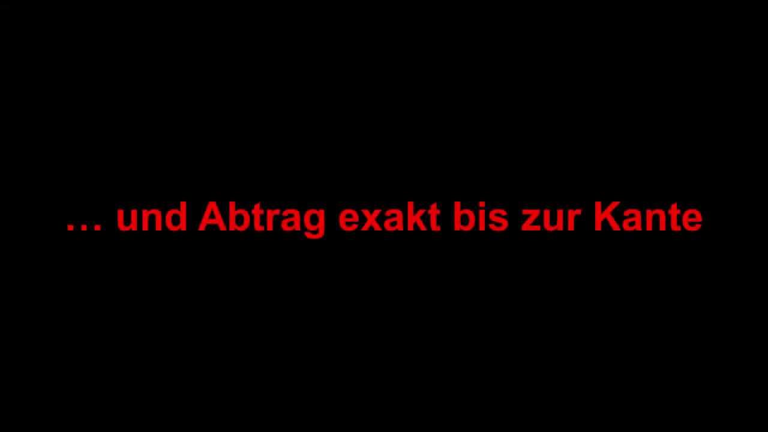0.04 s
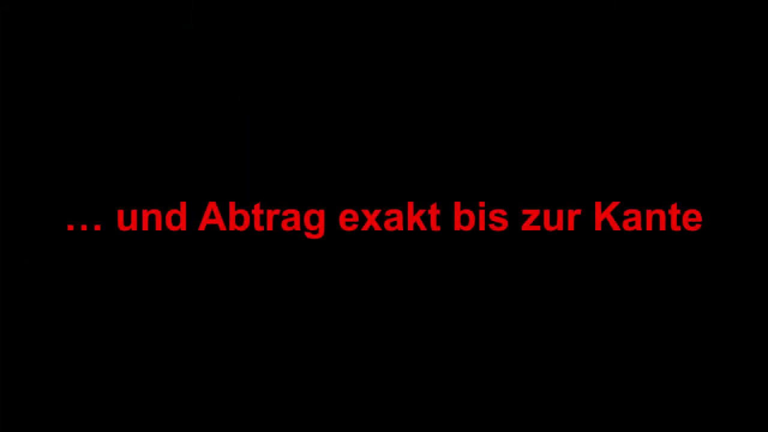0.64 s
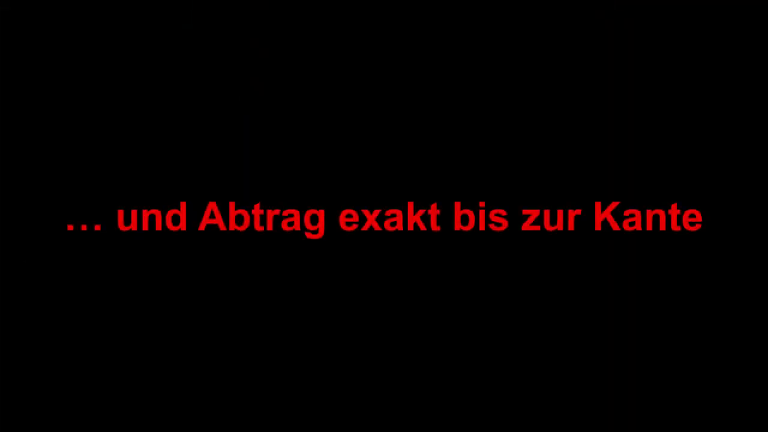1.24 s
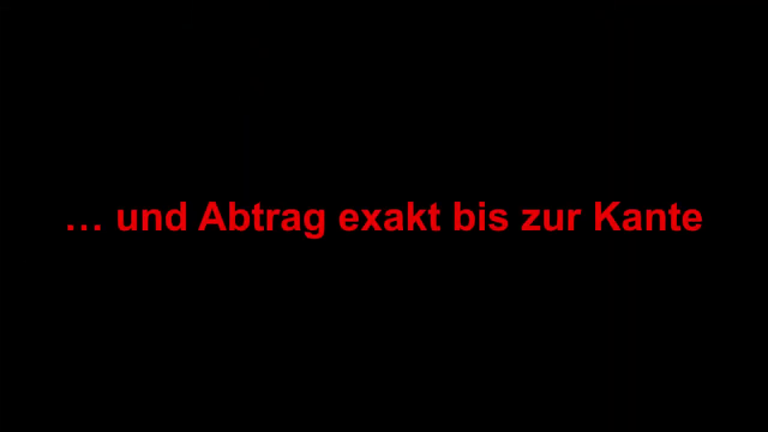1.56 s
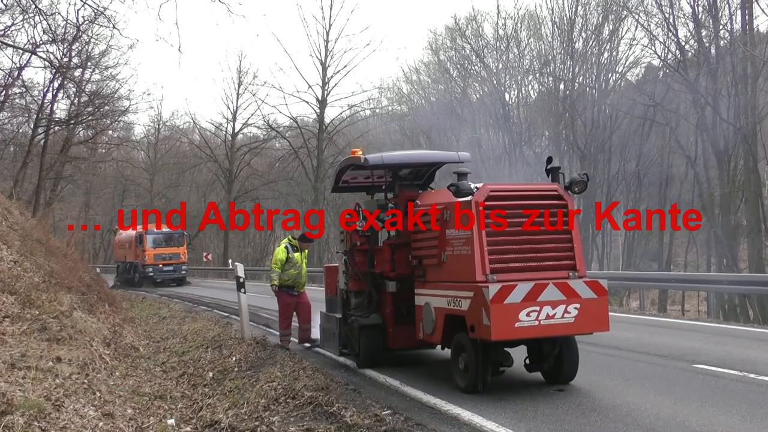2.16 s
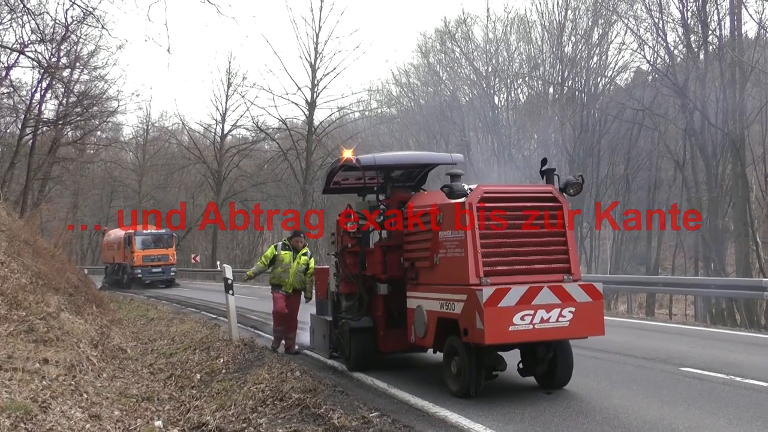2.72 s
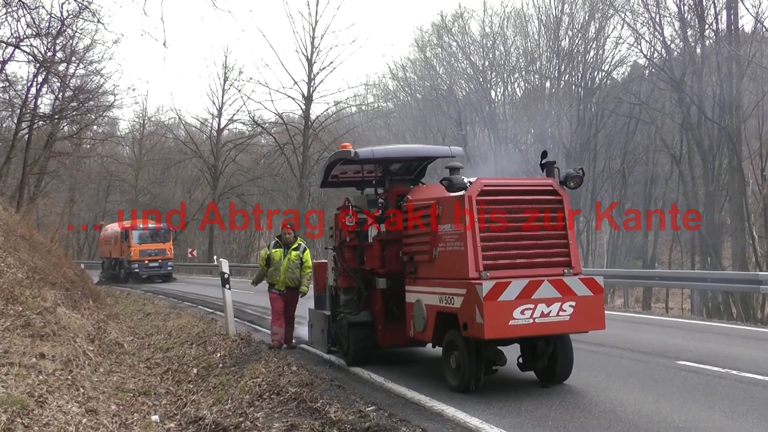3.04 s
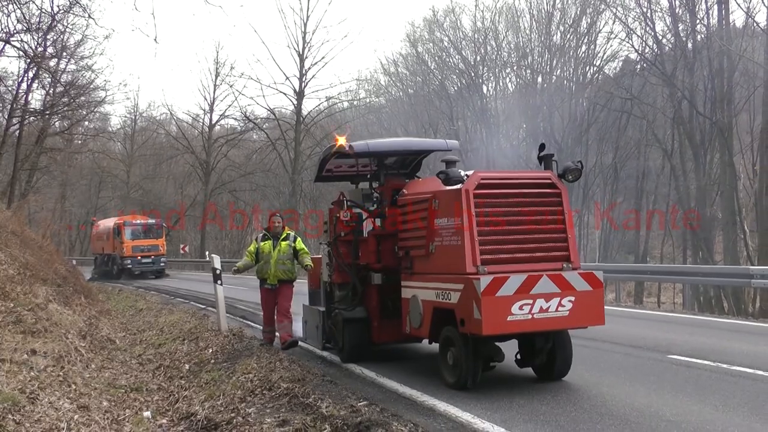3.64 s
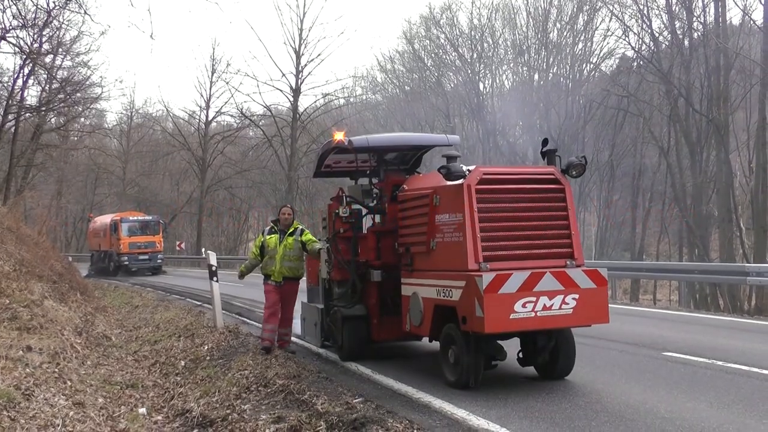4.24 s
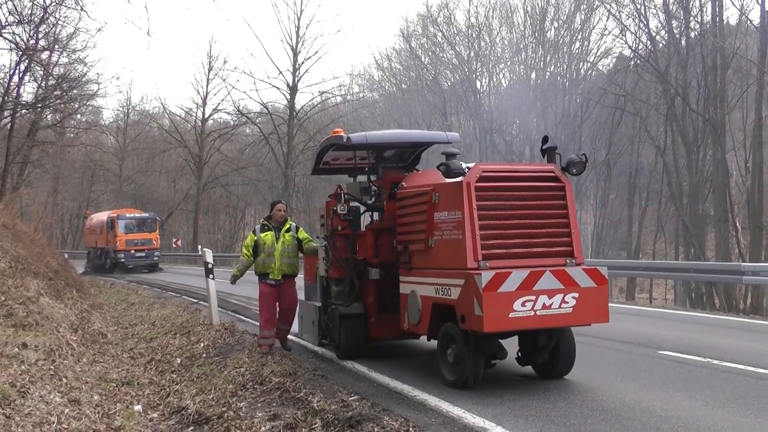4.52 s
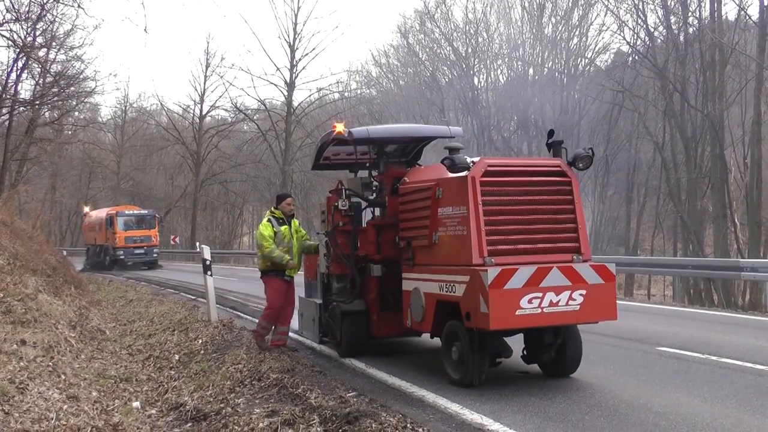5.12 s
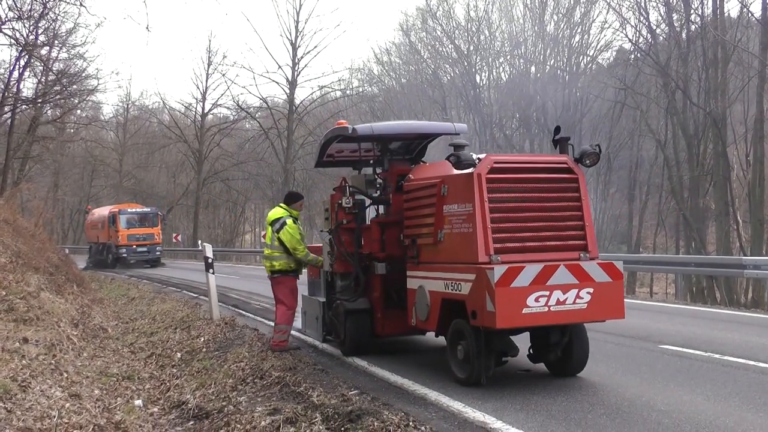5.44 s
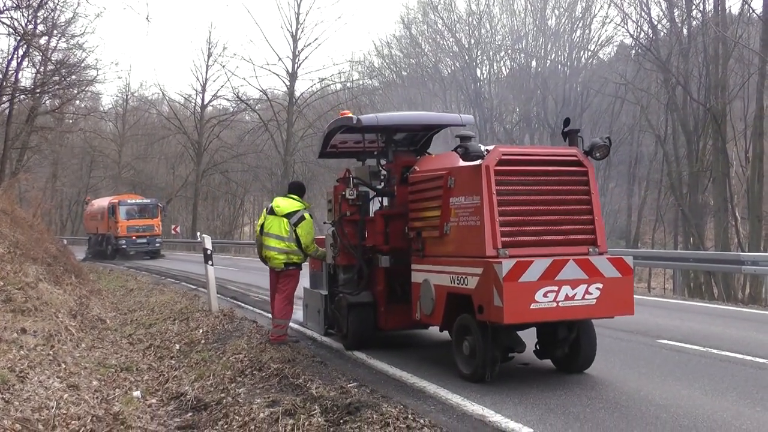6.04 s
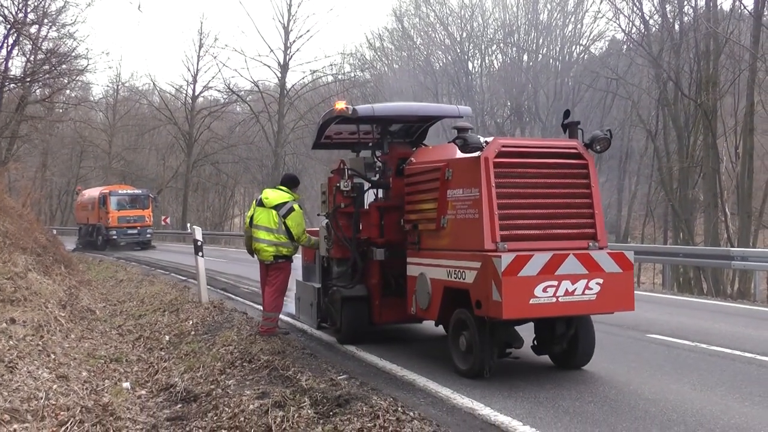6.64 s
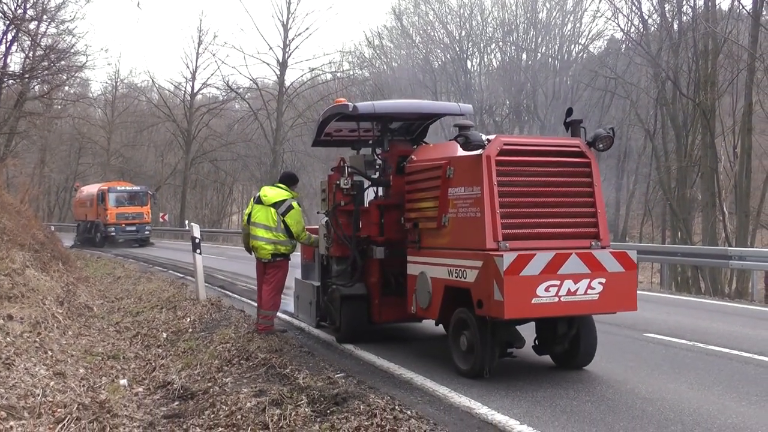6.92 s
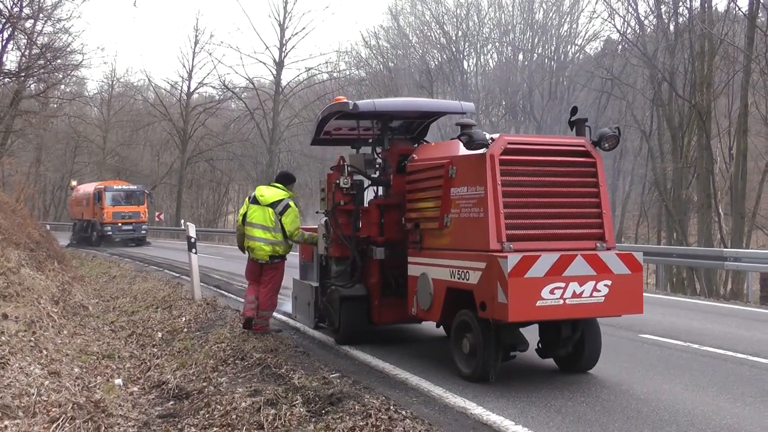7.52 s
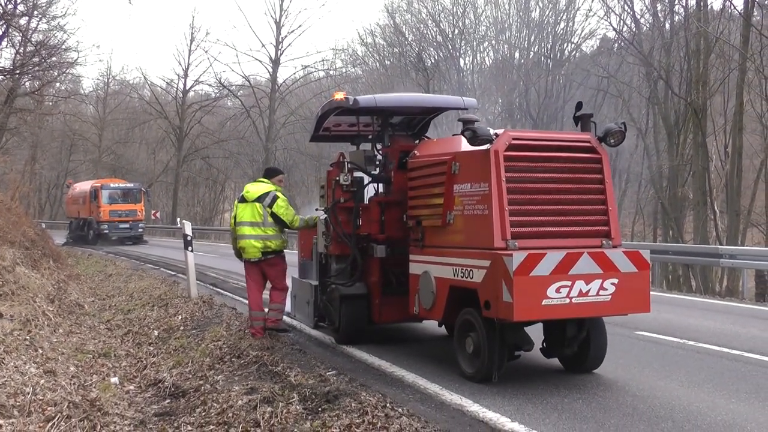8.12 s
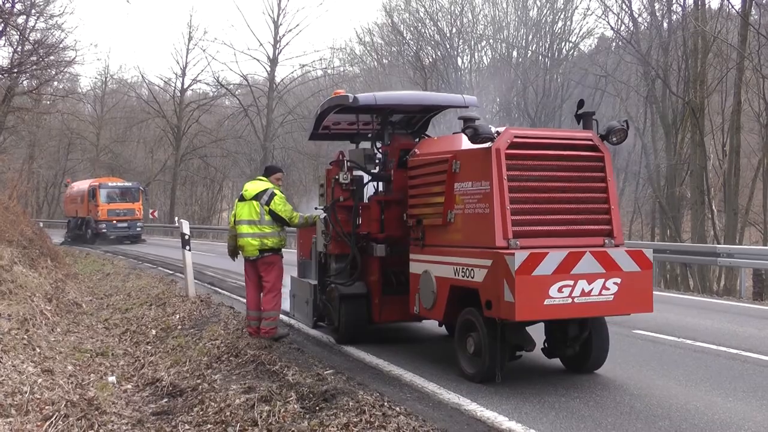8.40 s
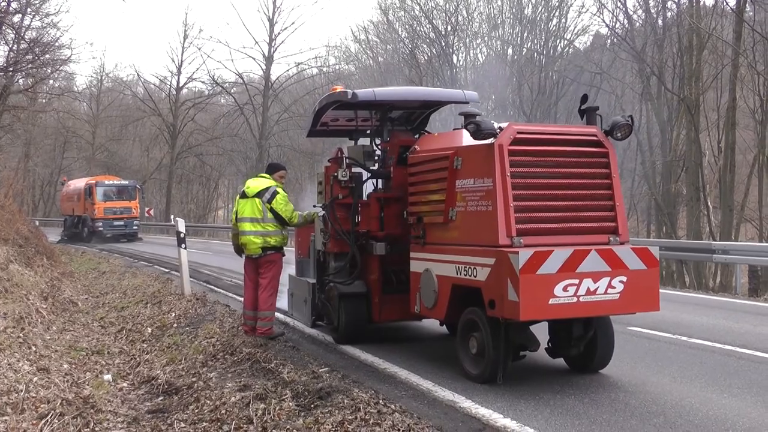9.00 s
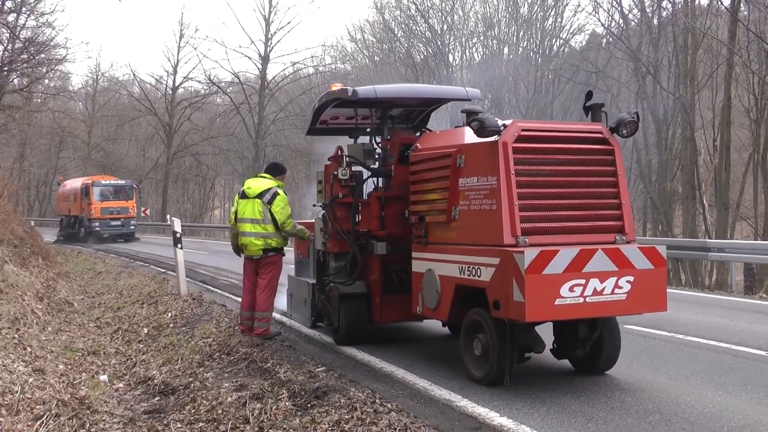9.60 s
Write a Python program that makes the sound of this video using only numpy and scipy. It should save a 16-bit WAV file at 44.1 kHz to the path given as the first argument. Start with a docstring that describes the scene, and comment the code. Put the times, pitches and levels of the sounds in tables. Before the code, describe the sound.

Steady diesel drone and fan howl of a road milling machine outdoors, with a rumbling, hissing cut that rasps now and then.

```python
"""Beside a country road, a stereo microphone stands a few metres from a small, creeping road milling machine.
After about a second of silence it fades in, already at work: the four-cylinder diesel drones and the
cooling fan howls, while over a low rumble the drum's picks thump into the asphalt, make the steel housing
roar and throw up a hiss of grit. From two seconds on, the cut surges and rasps over hard patches,
and the fan's hum grows as the machine comes nearer."""
import sys
import numpy as np
from scipy import signal
from scipy.fft import rfft, irfft
from scipy.io import wavfile

SR = 44100
rng = np.random.default_rng(int(sys.argv[2]) if len(sys.argv) > 2 else 0)


def int16_out(signal):
    """Quantize to a 16-bit WAV file."""
    q = np.round(np.clip(np.atleast_2d(signal).T, -1, 1) * 32767)
    wavfile.write(sys.argv[1], SR, q.astype(np.int16))


N = 430416
TIME = np.arange(N) / SR
FREQS = np.maximum(np.arange(N // 2 + 1) * SR / N, 1)
UNEVEN_HZ = 9.0   # how fast the levels of the cut waver

# Speed of the diesel, which also drives the fan. Each row: time in seconds, revolutions per minute.
ENGINE_RPM = [(1.31, 2360.0), (2.6, 2355.0), (3.03, 2336.0), (3.67, 2341.0), (4.53, 2317.0), (6.25, 2317.0),
              (6.47, 2342.0), (7.33, 2323.0), (8.4, 2312.0), (8.83, 2328.0), (9.69, 2325.0)]


def from_db(db):
    """Decibels to gain."""
    return 10 ** (np.asarray(db) / 20)


def in_time(points):
    """Points joined by straight lines over time."""
    seconds, value = np.transpose(points)
    return np.interp(TIME, seconds, value)


def over_hz(points):
    """Points joined by straight lines over log frequency."""
    hz, value = np.transpose(points)
    return np.interp(np.log(FREQS), np.log(hz), value)


def rms_one(x):
    """Scale to an rms of 1."""
    return x / np.sqrt(np.mean(x ** 2) + 1e-20)


def drift(rate_hz):
    """Slow random motion of spread 1."""
    return rms_one(irfft(rfft(rng.standard_normal(N)) / (1 + (FREQS / rate_hz) ** 2), N))


def tone(cycles, flutter, flutter_hz):
    """A tone of rms 1 whose strength and phase flutter in turbulent air."""
    swing = 1 + flutter * (drift(flutter_hz) + 1j * drift(flutter_hz)) / np.sqrt(2)
    return rms_one(np.real(swing * np.exp(2j * np.pi * (cycles + rng.random()))))


def impacts(per_s, spread_db):
    """Random clicks, many small and a few large."""
    sizes = from_db(spread_db * np.minimum(rng.exponential(1, N), 4))
    return sizes * rng.choice([-1, 1], N) * (rng.random(N) < per_s / SR)


def coloured(x, spectrum):
    """Pass x through a body with this spectrum, falling steeply beyond its ends; rms 1."""
    skirts = (1 + (spectrum[0][0] / FREQS) ** 8) * (1 + (FREQS / spectrum[-1][0]) ** 8)
    return rms_one(irfft(rfft(x) * from_db(over_hz(spectrum)) / np.sqrt(skirts), N))


def engine():
    """The diesel fires twice a turn; unequal cylinders add the orders between."""
    # Exhaust tones. Each row: multiple of the crank speed, level in dB halfway through.
    orders = [(1.5, -67), (2, -50.5), (4, -37.5), (4.5, -61), (5.5, -45.5), (6.5, -52)]
    turns = np.cumsum(in_time(ENGINE_RPM)) / 60 / SR
    drone = sum(from_db(db) * tone(k * turns, flutter=0.18, flutter_hz=6.1) for k, db in orders)
    return drone * from_db(-0.28 * (TIME - TIME.mean()))   # softens a little along the way


def fan():
    """The blades give a clean hum and rougher overtones; unequal blades add weak tones beside them."""
    # The blade-pass hum, growing as the machine nears. Each row: time in seconds, level in dB.
    hum_level = [(1.9, -38.5), (2.5, -38), (2.95, -43.5), (3.5, -37), (4.3, -38.5), (5.0, -35),
                 (7.3, -33.5), (9.3, -32)]
    # The howl. Each row: multiple of the shaft speed, level in dB halfway through,
    # share of flutter, flutter rate in Hz.
    overtones = [(19, -46.5, 1.1, 13), (23, -44, 1.9, 9.9), (24, -32.5, 0.41, 46), (35, -50, 1.1, 12),
                 (36, -45.5, 0.47, 6.5), (48, -40.5, 0.27, 20)]
    blades, blade_pass_hz, working_rpm = 12, 362.3, 2330
    lag_s, follows = 0.15, 0.32   # the fan trails the engine and takes up only a share of its swings
    rpm = np.interp(TIME - lag_s, TIME, in_time(ENGINE_RPM))
    passes = np.cumsum(blade_pass_hz * (1 + follows * (rpm / working_rpm - 1))) / SR
    hum = from_db(in_time(hum_level)) * tone(passes, flutter=0.1, flutter_hz=10.0)
    howl = sum(from_db(db) * tone(k * passes / blades, share, hz) for k, db, share, hz in overtones)
    return hum + howl * from_db(-0.05 * (TIME - TIME.mean()))   # the howl mellows on the approach


def pick_thumps(surge_db):
    """The picks thump into the road, biting deepest once in each turn of the drum."""
    # Slow course of the thumping. Each row: time in seconds, level in dB.
    level = [(1.9, -33.5), (3.3, -34), (3.6, -31.3), (4.25, -32.5), (4.6, -34.5), (7.3, -33), (7.85, -35),
             (8.4, -32.5), (9.7, -32.5)]
    # Colour of a thump. Each row: frequency in Hz, relative level in dB.
    colour = [(125, -10), (145, -3.5), (175, 3), (198, -0.5), (220, 2.2), (260, 2.5), (285, -2),
              (340, -6.5), (450, -20)]
    turns_per_s, deepest_bite_s = 3.02, 2.283
    bite_db = 1.34 * np.cos(2 * np.pi * turns_per_s * (TIME - deepest_bite_s))
    level_db = in_time(level) + 0.6 * surge_db + bite_db + 0.5 * drift(UNEVEN_HZ)
    return from_db(level_db) * coloured(impacts(per_s=1400, spread_db=0.8), colour)


def low_rumble():
    """A low rumble whose loudness wanders at random."""
    # Chance swells and dips of the rumble. Each row: time in seconds, level in dB.
    swells = [(1.9, -42), (3.05, -41), (3.4, -46), (4.2, -39), (4.6, -42.5), (6.05, -39.5), (6.6, -43),
              (7.35, -41.5), (7.8, -42.5), (9.3, -40.5), (9.7, -46)]
    # Colour of the rumble. Each row: frequency in Hz, relative level in dB.
    colour = [(20, -29), (45, -23), (58, -23), (72, -0.5), (84, -6.5), (96, -4.5), (108, 4), (118, -1),
              (135, -11)]
    level_db = in_time(swells) + drift(UNEVEN_HZ)
    return from_db(level_db) * coloured(impacts(per_s=900, spread_db=1.8), colour)


def housing_roar(effort_db, asphalt):
    """Broken lumps drum on the steel housing so densely that it roars."""
    # Colour of the housing. Each row: frequency in Hz, relative level in dB.
    colour = [(280, -12), (360, -8.5), (430, -5.5), (490, -3.0), (600, -0.1), (700, -1.5), (780, -3.5),
              (860, -2.5), (930, -8), (1170, -9), (1380, -6), (1480, -4.5), (1600, -7.5), (1950, -18)]
    fall_db_per_s = 0.15
    level_db = -27 + 0.75 * effort_db + 0.5 * asphalt - fall_db_per_s * TIME
    return from_db(level_db) * coloured(impacts(per_s=6000, spread_db=1.6), colour)


def grit_hiss(effort_db, asphalt):
    """Fine grit sprays on the picks and their steel holders, which add their ring to the hiss."""
    # Colour of the spray. Each row: frequency in Hz, relative level in dB.
    colour = [(1450, -7.5), (1780, -2.5), (2150, -1.5), (2900, -2.5), (3550, -9), (4300, -11), (5800, -15),
              (7500, -18.5), (8700, -23), (11000, -28), (14000, -31), (15600, -32.5)]
    # Resonances of the steel. Each row: frequency in Hz, width in Hz, height above the hiss in dB.
    steel_modes = [(2120, 150, 3), (2960, 280, -0.3), (3880, 110, 4), (4450, 250, 4), (5030, 310, 3.5),
                   (5760, 210, 4.5), (6300, 220, 2), (7000, 280, 1.4), (7900, 490, 2), (9400, 350, 1),
                   (11900, 250, 0.5), (13900, 370, 2)]
    spray = coloured(impacts(per_s=19000, spread_db=2.5), colour)
    ring = sum((from_db(db) - 1) / (1 + 2j * (FREQS - hz) / width) for hz, width, db in steel_modes)
    level_db = -30.5 + 0.75 * effort_db + 0.45 * asphalt
    return from_db(level_db) * rms_one(irfft(rfft(spray) * (1 + ring), N))


def pick_rasp(surge_db):
    """The picks rasp only while they cross a hard patch."""
    # Colour of the rasp. Each row: frequency in Hz, relative level in dB.
    colour = [(1900, -6), (2800, 2), (3400, -7)]
    extra_power = np.maximum(from_db(surge_db) ** 2 - 1, 0)
    return from_db(-35.5) * np.sqrt(extra_power) * coloured(impacts(per_s=3500, spread_db=4.0), colour)


def drum():
    """The sounds of the cut over the low rumble, with a rounded surge at each hard patch."""
    # How hard the drum cuts. Each row: time in seconds, relative load in dB.
    load = [(1.96, 0.6), (3.36, 0.2), (3.56, -0.4), (5.55, -0.14), (5.95, 0), (7.15, 0.3), (7.75, -0.1),
            (8.94, 0.26), (9.14, -0.7), (9.74, 0.2)]
    # Hard patches in the road. Each row: crest in seconds, length in seconds, extra load in dB.
    hard_patches = [(2.02, 0.088, 1.1), (2.192, 0.089, 1), (2.68, 0.092, 0.5), (3.56, 0.12, 3.5),
                    (3.76, 0.099, 2), (4.16, 0.11, 2.3), (4.498, 0.084, 2), (5.163, .1, 1.5),
                    (5.878, .09, 2), (6.065, .12, 1.2), (6.51, 0.09, 1.9), (7.145, .12, 1.5),
                    (8.934, 0.4, 1.1), (9.31, 0.058, 2.5)]
    surge_db = sum(db * np.exp(-(2 * (TIME - crest) / length) ** 2) for crest, length, db in hard_patches)
    effort_db = in_time(load) + surge_db
    asphalt = drift(UNEVEN_HZ)   # the road changes under the picks: roar and hiss waver together
    low_end = pick_thumps(surge_db) + low_rumble()
    debris = housing_roar(effort_db, asphalt) + grit_hiss(effort_db, asphalt)
    return low_end + debris + pick_rasp(surge_db)


def roadside(x, scatter_s):
    """Bank, trees and guard rail scatter the sound, so left and right hear it a little differently."""
    # Scattered sound. Each row: frequency in Hz, level against the direct sound in dB.
    diffuse = [(30, -9), (80, -18), (230, -16.5), (410, -17), (740, -16), (1050, -9.5), (1450, -15),
               (3000, -14.5), (5000, -16), (8500, -11), (10000, -41)]
    tail = rng.standard_normal(N) * np.exp(-np.minimum(TIME / scatter_s, 20))
    scattered = np.exp(1j * np.angle(rfft(tail))) * from_db(over_hz(diffuse))
    sides = np.array([[1], [-1]])
    return irfft(rfft(x) * (1 + sides * scattered), N)


def microphone(x):
    """Level and phase differ between the microphone's left and right ports."""
    # Balance of the ports. Each row: frequency in Hz, left minus right in dB.
    balance = [(100, 1), (280, 0.3), (420, -3.5), (700, -1.8), (880, 1), (1080, -5), (1380, 0),
               (2300, -0.7), (3300, 1.5), (5200, 0), (6500, 0), (8000, -1), (9200, 0)]
    # Phase between the ports. Each row: frequency in Hz, lead of the left in radians.
    lead = [(60, -0.22), (260, -0.15), (370, -0.49), (500, -0.18), (740, 0.0032), (970, -0.19),
            (1200, -0.0087), (1550, -0.27), (1800, 0.13), (4000, 0.022)]
    sides = np.array([[0.5], [-0.5]])
    return irfft(rfft(x) * from_db(sides * over_hz(balance)) * np.exp(1j * sides * over_hz(lead)), N)


def scene():
    """The whole machine, heard from the roadside a few metres away."""
    return microphone(engine() + fan() + roadside(drum(), scatter_s=0.04))


def record(dry):
    """A straight fade-in from silence; the highest treble is cut."""
    fade_start_s, fade_length_s, cutoff_hz = 0.93, 1, 15750
    fade = np.clip((TIME - fade_start_s) / fade_length_s, 0, 1)
    low_pass = signal.ellip(12, 0.1, 80, cutoff_hz, fs=SR, output="sos")
    return signal.sosfilt(low_pass, dry * fade)


dry = scene()
out = record(dry)
int16_out(out)
```